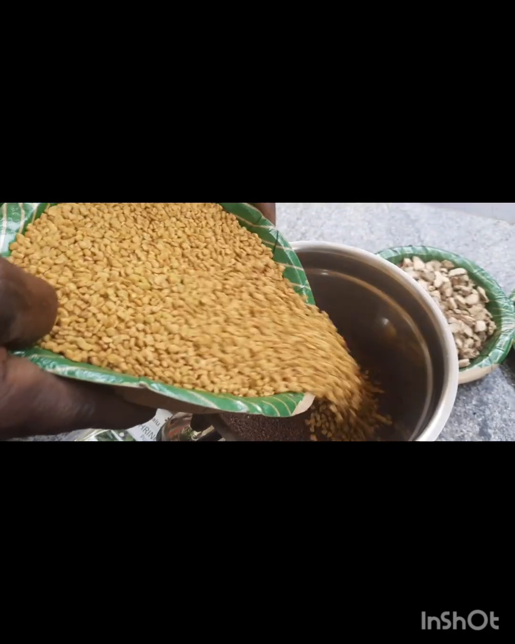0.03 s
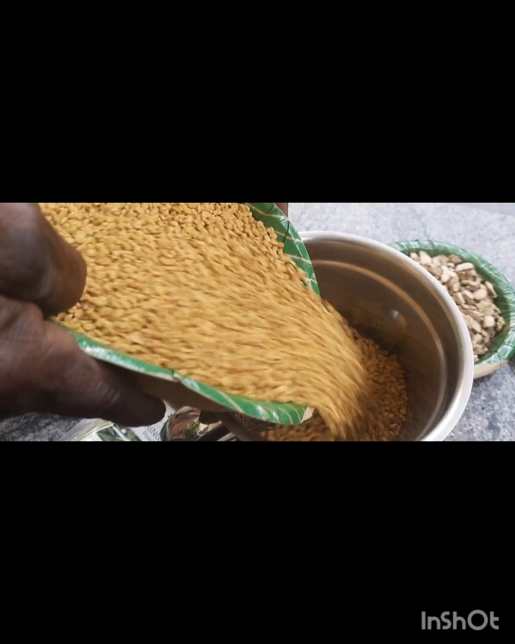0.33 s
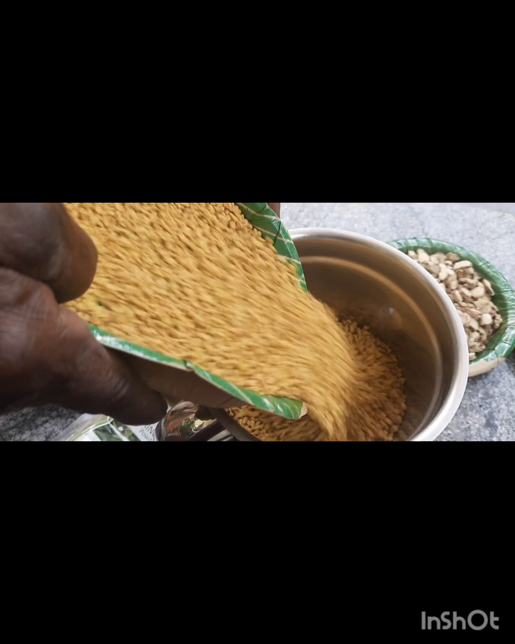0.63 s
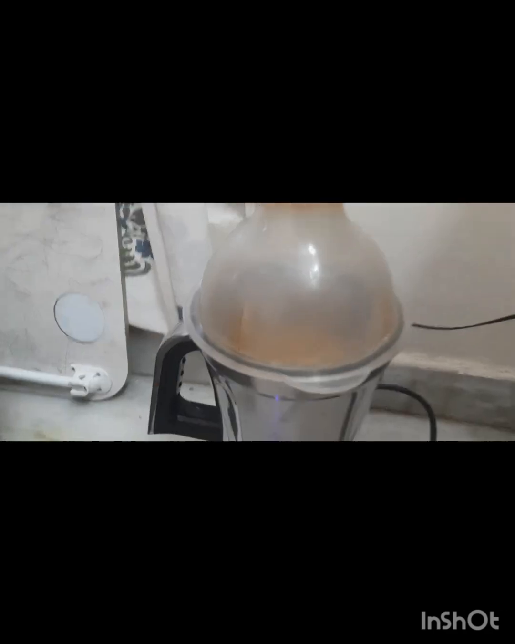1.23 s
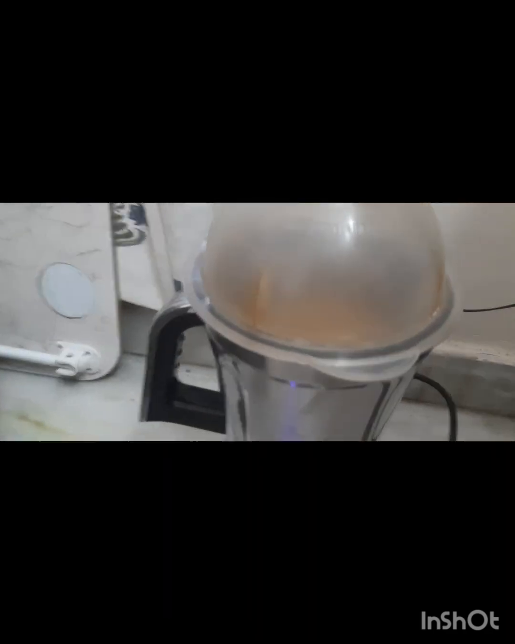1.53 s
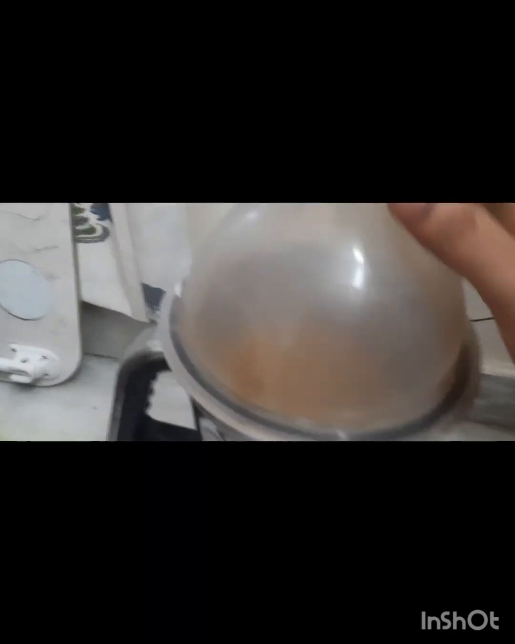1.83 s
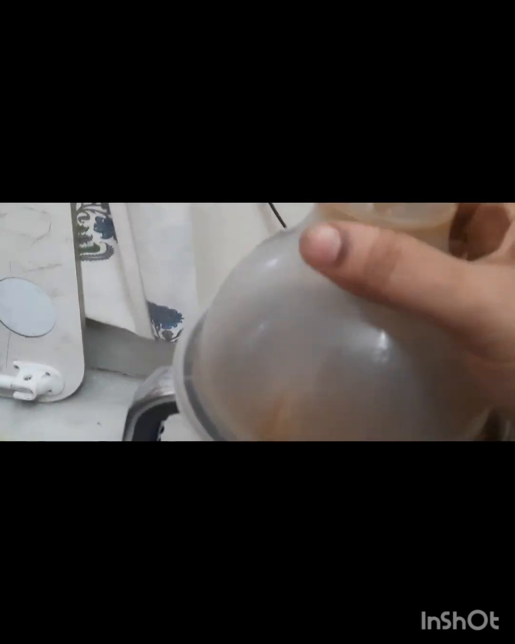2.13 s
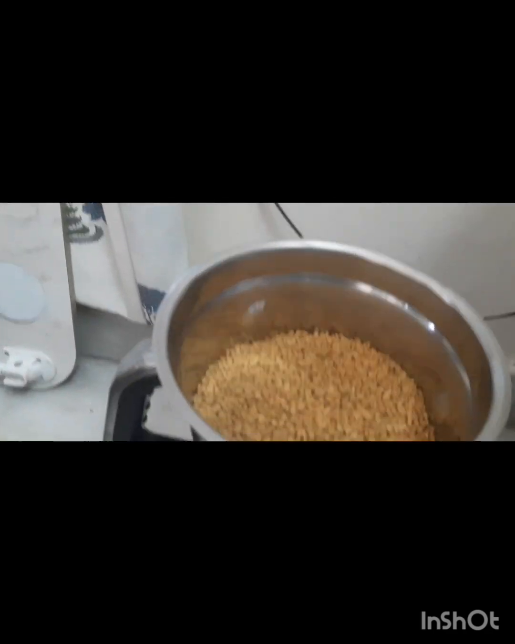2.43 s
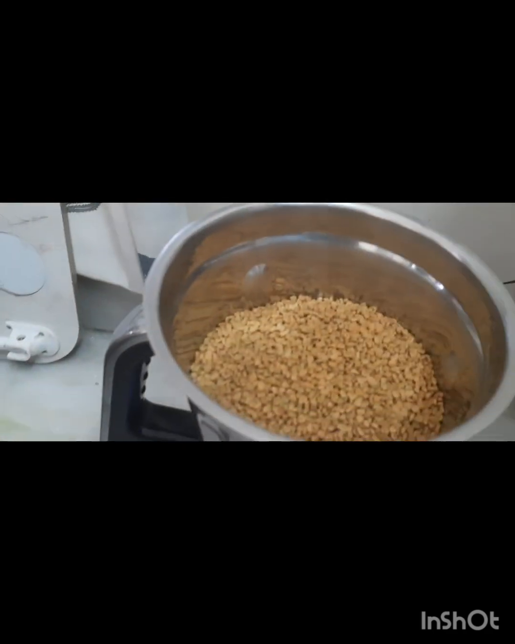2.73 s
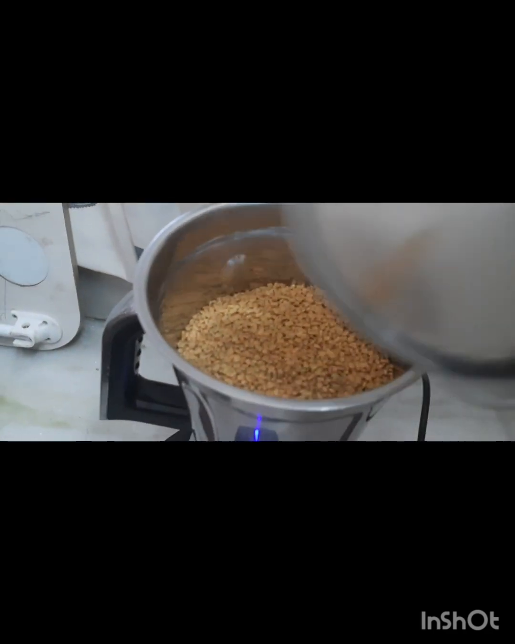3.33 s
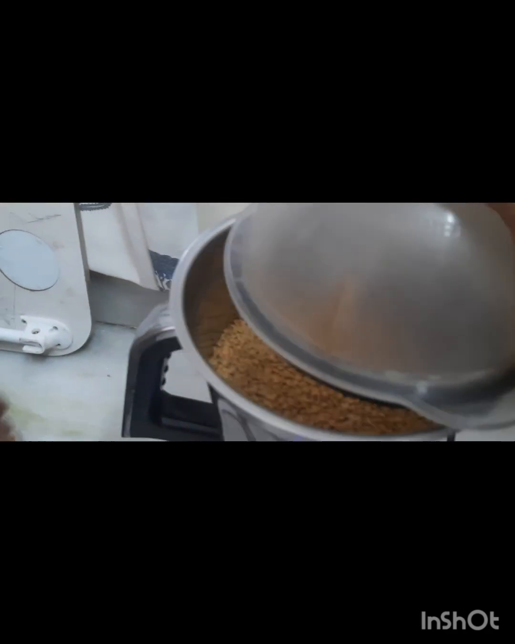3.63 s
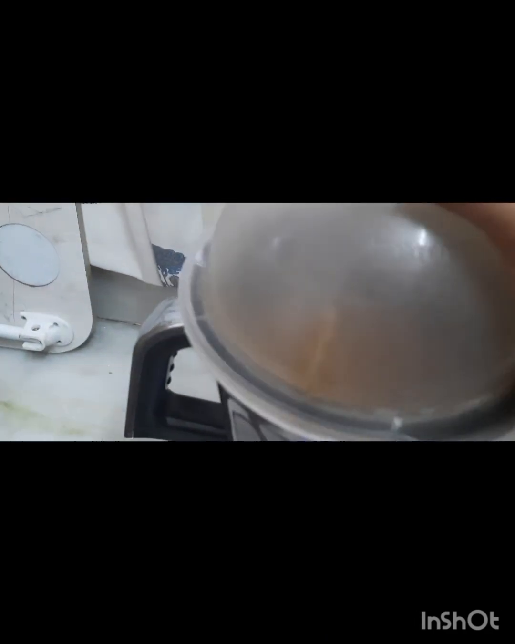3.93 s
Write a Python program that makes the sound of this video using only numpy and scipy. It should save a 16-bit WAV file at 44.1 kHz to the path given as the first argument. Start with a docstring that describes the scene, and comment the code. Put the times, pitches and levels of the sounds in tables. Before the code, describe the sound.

Dry seeds pour densely into a steel jar, close by, swelling and stopping dead at 1.3 seconds, followed by a microphone bump. From 1.8 to 2.2 seconds a plastic lid comes loose with soft hollow thuds and a snap. Thin bangles clink faintly. Around 3.4 seconds the lid lands with two sharper knocks, then thuds and scrapes on the ringing rim until 4 seconds, over a low kitchen hum.

```python
"""Dry seeds rush from a tray into a steel mixer jar, thousands of tiny impacts a second, then stop dead.
The hand-held phone close by is bumped. A domed plastic lid is worked loose, lifted off and knocked
back on with hollow thuds, its edge snapping and scraping on the ringing steel rim. Thin bangles
clink on the moving wrist, in a small kitchen with a low hum."""
import sys
import numpy as np
from scipy import signal
from scipy.fft import rfft, irfft
from scipy.io import wavfile
from scipy.ndimage import uniform_filter1d

SR = 44100
rng = np.random.default_rng(int(sys.argv[2]) if len(sys.argv) > 2 else 0)


def unload_audio(sound):
    """Save the sound as a 16-bit wav file, at the path given as the first command line argument."""
    columns = np.transpose(np.atleast_2d(sound))
    # keep every value between -1 and 1, then stretch to whole-number steps
    steps = np.round(np.clip(columns, -1, 1) * 32767)
    wavfile.write(sys.argv[1], SR, steps.astype(np.int16))


N = 176400

# swell of the pour: time_s, level_db
SEED_FLOW = [(0.1, -39), (0.2, -37), (0.45, -31.5), (0.6, -30.5), (1.0, -31.5), (1.33, -33.5)]
# EQ of seeds landing in the jar: freq_hz, gain_db
SEED_EQ = [(150, -35), (400, -16), (700, 1), (1000, -5), (1500, -1.5), (2200, -0.5), (3400, 0), (5100, 2.5),
           (7300, -2), (8500, -1.5), (10000, -7.5), (15500, -3)]
# lean to the left, applied in part to each side with opposite signs: freq_hz, lean_db
SEED_LEAN = [(380, -3), (700, -4.5), (1290, -0.5), (2380, 1.5), (4400, 6.5), (8120, 0.5), (15000, 9.5)]
# air resonances of the jar: pitch_hz, width_hz, level_db
JAR_AIR = [(1230, 126, -17), (1650, 220, -20)]
# EQ of the rumble under the pour: freq_hz, gain_db
RUMBLE_EQ = [(25, -44), (45, -14), (72, 5), (110, 0), (300, -19.5), (600, -60)]


def pour(start_s=0.077, stop_s=1.339, seed_db=1.92, echo_db=-8.5, rumble_db=-3.5):
    """A dense rush of seed impacts echoes in the jar, over a rumble that follows the flow."""
    t = np.arange(N) / SR
    flow = amp(np.interp(t, *np.array(SEED_FLOW).T))
    gate = np.clip((t - start_s) / 0.0088, 0, 1) * (t < stop_s)
    hits = stereo(grains(per_s=6000, spread_db=2, size=N))
    echoes = rng.standard_normal((2, SR // 16)) * fade(t60=0.035, size=SR // 16)
    inside = colour(signal.fftconvolve(hits, echoes, axes=1)[:, :N], [(2000, -5), (6000, -10.5)])
    seeds = unit(colour(hits + amp(echo_db) * unit(inside), SEED_EQ))
    for hz, width, db in JAR_AIR:
        seeds += amp(db) * unit(shape(hits, lambda f: 1 / (1 + 1j * (f - hz * hz / f) / width)))
    seeds = np.array([colour(seeds[0], SEED_LEAN, 0.49), colour(seeds[1], SEED_LEAN, -0.4)])
    rumble = unit(stereo_noise(RUMBLE_EQ, N)) * pan(-1.6)
    return flow * gate * (amp(seed_db) * seeds + amp(rumble_db) * rumble)


# hollow modes of the lid: pitch_hz, level_db, t60_s
LID_MODES = [(273, -3.5, 0.065), (336, -9.5, 0.032), (386, -7.5, 0.04), (504, -8.5, 0.031),
             (588, -1, 0.023), (678, 1.5, 0.015), (786, -12.5, 0.046)]
# slower ring of the jar under it: pitch_hz, level_db, t60_s
JAR_MODES = [(285, -8, 0.22), (385.4, 3.5, 0.19), (494.5, 0, 0.29), (548, -6, 0.27)]
# EQ of a knock's crack: freq_hz, gain_db
CRACK_EQ = [(150, -15), (400, 12.5), (700, 7), (1300, 1.5), (1800, -2), (3000, -0.5), (4500, -7),
            (6800, -15), (9000, -6), (16000, -17)]
# lid knocks (pressing stiffens the lid and shifts its pitch):
# start_s, body_db, cutoff_hz, crack_db, crack_t60_s, jar_db, pitch_ratio
LID_KNOCKS = [(1.8215, -10, 232, -30.5, 0.051, -72, 1.03), (1.984, -9, 234, -27.5, 0.067, -56, 1.05),
              (2.2075, -11.5, 200, -30.5, 0.065, -73, 1.04), (3.3761, -2, 1500, -17, 0.056, -31.5, 1.024),
              (3.4565, -2, 1190, -12, 0.033, -24.5, 1.04), (3.725, -25, 400, -38.5, 0.076, -37.5, 1.04),
              (3.7755, -4, 330, -16, 0.033, -36, 1.13), (3.861, -13, 200, -50, .03, -50, 1.11),
              (3.899, -8.5, 199, -53, .03, -60, 0.99)]


def lid_knocks(low_cut_hz=220, graze_s=0.017, graze_db=-12.5):
    """Each knock cracks and rings lid and jar; a softer contact leaves only the lid's low modes."""
    out, size = np.zeros((2, N)), SR // 2
    for s, db, cutoff_hz, crack_db, crack_t60, jar_db, ratio in LID_KNOCKS:
        modes = [(hz * ratio, g - 10 * np.log10(1 + (hz / cutoff_hz) ** 4), t60)
                 for hz, g, t60 in LID_MODES]
        body = amp(db) * ring(modes, size, rise_cycles=0.57)  # the lows bloom late
        jar = amp(jar_db) * ring(JAR_MODES, size)
        hollow = low_cut(body + jar, low_cut_hz)  # small objects radiate little bass
        crack = unit(low_cut(stereo_noise(CRACK_EQ, size), low_cut_hz))
        add(out, s, hollow * pan(-3.5) + amp(crack_db) * crack * fade(crack_t60, size) * pan(1.4))
        if cutoff_hz < 600:  # on soft knocks the edge grazes just before it lands
            lead = int(graze_s * SR)
            add(out, s - graze_s, amp(crack_db + graze_db) * crack[:, -lead:] * np.linspace(0, 1, lead))
    return out


# EQ of a snap: freq_hz, gain_db
SNAP_EQ = [(200, -25), (800, -7.5), (2300, -13), (3300, -2.5), (4100, 1.5), (5800, -3), (7000, -20),
           (8500, -1), (11000, -5.5), (16000, -9)]
# snaps of the lid's edge: start_s, level_db, tilt_db_per_octave
LID_SNAPS = [(1.9223, -12.5, 0), (1.9664, -24.5, -7)]


def lid_snaps(t60_s=0.025):
    """The plastic edge slips over the rim with a short, dry snap."""
    out, size = np.zeros((2, N)), SR // 8
    for s, db, tilt_db in LID_SNAPS:
        noise = unit(tilt(colour(rng.standard_normal((2, size)), SNAP_EQ), tilt_db))
        add(out, s, amp(db) * noise * fade(t60_s, size) * pan(5))
    return out


# modes of the steel rim before the hand damps them: pitch_hz, level_db, t60_s
RIM_MODES = [(5060, -8, .12), (5450, -4, .16), (8540, -14, .14), (9740, -4, .12), (10480, -3, .12),
             (10560, -5, .1), (11190, -9, .07), (12600, -4, .14), (13860, -10, .08), (15680, 1, .14)]
# scrapes along the rim: start_s, level_db, scrape_t60_s, focus_hz, pan_db
RIM_SCRAPES = [(3.637, -37, 0.022, 14000, 6.5), (3.672, -37, 0.22, 12800, 7),
               (3.792, -34.5, 0.033, 11330, 8), (3.824, -29, 0.035, 11300, 5),
               (3.898, -22, 0.015, 11600, 11), (3.909, -29.5, 0.13, 12400, 3),
               (3.958, -34, 0.052, 11100, 6)]


def rim_scrapes():
    """The lid's edge drags along the steel rim and makes it sing."""
    return metal(RIM_SCRAPES, RIM_MODES, spread_hz=3500, grit_db=-2)


# modes of thin bangles before the hand damps them: pitch_hz, level_db, t60_s
BANGLE_MODES = [(5900, -11, .15), (7470, -9, .12), (9020, -5, .12), (10400, -3, .12), (10860, -7, .15),
                (11950, -9, .12), (13700, -4, .12), (14460, -2, .08), (15400, -8, .12)]
# clinks at the wrist: start_s, level_db, rattle_t60_s, focus_hz, pan_db
BANGLE_CLINKS = [(1.746, -33.5, 0.014, 14500, 3), (1.778, -45, .04, 7700, -3),
                 (1.907, -45, 0.013, 14000, 5), (2.078, -39.5, .02, 10000, 2), (2.13, -47, 0.03, 11500, 2),
                 (2.414, -32, 0.014, 12500, -3), (2.433, -32, 0.064, 13000, -1.5),
                 (2.74, -44.5, 0.11, 12500, 8), (2.925, -47, 0.13, 11200, 5), (3.226, -40, 0.015, 10900, 1),
                 (3.277, -46.5, 0.018, 8100, -1), (3.32, -45, 0.15, 12000, -1)]


def bangle_clinks():
    """Bangles rattle together with a bright shimmer as the hand moves."""
    return metal(BANGLE_CLINKS, BANGLE_MODES, spread_hz=4900, grit_db=-3)


# EQ of the sliding: freq_hz, gain_db
RUB_EQ = [(300, 4), (1200, -5), (2400, -3), (3700, 0.5), (7000, -2.5), (12000, 1.5), (16000, -5)]
# slides of the lid: start_s, length_s, level_db, tilt_db_per_octave
LID_RUBS = [(1.449, 0.16, -44.5, 3.5), (1.78, 0.18, -45.5, -1), (1.922, 0.069, -45, -1),
            (2.015, 0.16, -43.5, -0.5), (2.164, 0.078, -40.5, -1.5), (3.128, 0.091, -44.5, -7),
            (3.372, 0.083, -44, -8), (3.477, 0.16, -43, -4.5), (3.545, 0.036, -39, -1),
            (3.745, 0.24, -38.5, -0.5)]


def lid_rubs(rise_share=0.13):
    """Plastic slides over steel and seeds shift: grit that swells quickly and dies away."""
    out, size = np.zeros((2, N)), SR // 2
    t = np.arange(size) / SR
    for s, length, db, tilt_db in LID_RUBS:
        slips = stereo(grains(per_s=1800, spread_db=4.4, size=size))
        grit = unit(tilt(colour(slips, RUB_EQ), tilt_db))
        swell = np.sqrt(np.interp(t / length, [0, rise_share, 1], [0, 1, 0]))
        add(out, s, amp(db) * grit * swell * pan(2.9))
    return out


# bumps on phone and tray, and the low thud of the lid's last soft knock:
# start_s, level_db, pitch_hz, t60_s, pan_db
BUMPS = [(0.0575, -8, 880, 0.0068, 0), (0.0615, -9, 1040, 0.0073, -17), (0.0634, -20.5, 416, 0.016, -3),
         (0.0748, -22, 750, 0.012, -4), (1.3888, 2.5, 340, 0.007, -34), (1.3886, -14, 1360, 0.0035, -32),
         (1.4105, -15, 1110, 0.0047, -28), (3.895, -29.5, 86, .09, -4)]


def bumps(grit_db=-13):
    """Dull thumps: one heavily damped mode each, with a trace of grit."""
    out, size = np.zeros((2, N)), SR // 8
    for s, db, hz, t60, pan_db in BUMPS:
        grit = unit(colour(rng.standard_normal(size), [(1500, 8), (3500, -49), (16000, -16)]))
        thump = ring([(hz, 0, t60)], size) + amp(grit_db) * grit * fade(t60, size)
        add(out, s, amp(db) * low_cut(thump, hz=70) * pan(pan_db))
    return out


# EQ of the finger's brush: freq_hz, gain_db
BRUSH_EQ = [(30, -12), (90, -2), (250, -4), (1000, -18.5), (4000, -29), (16000, -43)]


def finger_brush(peak_s=1.392, width_s=0.024, level_db=-21.5):
    """A finger brushes the right microphone around the big bump."""
    swell = np.exp(-abs(np.arange(N) / SR - peak_s) / width_s)
    right = amp(level_db) * swell * unit(colour(rng.standard_normal(N), BRUSH_EQ))
    return np.array([np.zeros(N), right])


# EQ of the tray's clatter: freq_hz, gain_db
CLATTER_EQ = [(100, -5), (350, -1), (1500, -1), (3000, -25), (16000, -25)]


def tray_clatter(start_s=0.06, level_db=-22, t60_s=0.064):
    """The tipping tray meets the jar with a short, dull rattle."""
    out, size = np.zeros((2, N)), SR // 8
    add(out, start_s, amp(level_db) * unit(stereo_noise(CLATTER_EQ, size)) * fade(t60_s, size))
    return out


# EQ of the room's tail: freq_hz, gain_db
ROOM_EQ = [(100, 2), (280, 4.5), (500, 6.5), (900, 2), (16000, 1)]


def kitchen_reverb(x, t60_s=0.48, send_db=-15.5):
    """Hard walls return a short, warm tail."""
    size = SR // 2
    onset = np.clip(np.arange(size) / SR / 0.0032 - .5, 0, 1)
    tail = stereo(rng.standard_normal((2, size))) * fade(t60_s, size) * onset
    tail = colour(tail / np.sqrt(np.sum(tail ** 2) / 2), ROOM_EQ)[:, :size - size // 8]
    return amp(send_db) * signal.fftconvolve(x, tail, axes=1)[:, :N]


# EQ of the room tone: freq_hz, gain_db
ROOM_TONE_EQ = [(25, -30), (42, -6), (64, 10.5), (95, 4), (200, -5), (350, 3), (560, -6.5), (860, -7.5),
                (1500, -15.5), (4000, -22.5), (16000, -25)]


def room_tone(level_db=-46):
    """The kitchen's steady bed of low hum and hiss."""
    return amp(level_db) * unit(stereo_noise(ROOM_TONE_EQ, N)) * pan(-1.7)


def metal(touches, modes, spread_hz, grit_db, hand_damping=1.2, scatter_db=7, detune=0.06, partner_db=-6):
    """Runs of tiny contacts ring metal; each touch wakes a new mix of modes, favouring its focus pitch."""
    out, size = np.zeros((2, N)), SR // 3
    t = np.arange(size) / SR
    for s, db, run_t60, focus_hz, pan_db in touches:
        attack = 1 - np.exp(-t / (0.075 * run_t60))
        slips = grains(per_s=4500, spread_db=2.1, size=size) * fade(run_t60, size) * attack
        reach = lambda f: 1 / (1 + ((f - focus_hz) / spread_hz) ** 2)
        partners = [(f * (1 + detune * rng.standard_normal()), g + partner_db, t60)
                    for f, g, t60 in list(modes) * 2]
        struck = [(f, g + scatter_db * rng.standard_normal() + 20 * np.log10(reach(f)), t60 / hand_damping)
                  for f, g, t60 in list(modes) + partners]
        tone = signal.fftconvolve(slips, ring(struck, SR // 6)[None], axes=1)[:, :size]
        grit = low_cut(shape(slips, reach), hz=4600)
        sound = unit(tone) + amp(grit_db) * unit(grit)
        loudest = np.sqrt(uniform_filter1d(sound ** 2, size=441).max(axis=1, keepdims=True))
        add(out, s, amp(db) * sound / loudest * pan(pan_db))
    return out


def ring(modes, size, rise_cycles=0):
    """Decaying modes (pitch_hz, level_db, t60_s), each building up over rise_cycles."""
    t = np.arange(size) / SR
    return sum(amp(db) * np.sin(2 * np.pi * hz * t) * fade(t60, size)
               * (1 - np.exp(-hz * t / max(rise_cycles, 1e-6))) for hz, db, t60 in modes)


def grains(per_s, spread_db, size):
    """Tiny impacts of random timing and strength, on two channels."""
    hit = rng.random((2, size)) < per_s / SR
    polarity = rng.choice([-1, 1], (2, size))
    strength = amp(spread_db * np.minimum(rng.standard_normal((2, size)), 2))
    return unit(hit * polarity * strength)


def stereo(x, alike_hz=770):
    """Two unrelated noises as left and right: alike in the bass, wide in the treble."""
    width = lambda f: np.minimum(np.hypot(.2, f / alike_hz / 2), 1)
    side = shape(x[1], width)
    mid = shape(x[0], lambda f: np.sqrt(2 - width(f) ** 2))
    return np.array([mid + side, mid - side]) / np.sqrt(2)


def stereo_noise(eq, size):
    return colour(stereo(rng.standard_normal((2, size))), eq)


def shape(x, gain):
    """Filter by a gain given as a function of frequency."""
    freqs = np.fft.rfftfreq(x.shape[-1], 1 / SR) + 1e-3
    return irfft(rfft(x) * gain(freqs), x.shape[-1])


def colour(x, eq, share=1):
    """Apply a share of an EQ curve (freq_hz, gain_db)."""
    hz, db = np.array(sorted(eq)).T
    return shape(x, lambda f: amp(share * np.interp(np.log(f), np.log(hz), db)))


def tilt(x, db):
    """Tilt the treble by db per octave."""
    return shape(x, lambda f: amp(db * np.log2(np.maximum(f, 1500) / 1500)))


def low_cut(x, hz):
    return signal.sosfilt(signal.butter(2, hz, "highpass", fs=SR, output="sos"), x)


def amp(db):
    return 10 ** (np.asarray(db) / 20)


def unit(x):
    """Scale to rms 1."""
    return x / np.sqrt(np.mean(x ** 2) + 1e-18)


def pan(db):
    """Constant-power gains; positive is left."""
    return unit(amp(np.array([[db], [-db]]) / 2))


def fade(t60, size):
    """Fall by 60 dB every t60 seconds."""
    return np.exp(-np.log(1000) * np.arange(size) / SR / max(t60, 1e-3))


def add(out, s, sound):
    """Mix a sound in at s seconds."""
    i = max(int(s * SR), 0)
    out[:, i:i + sound.shape[-1]] += sound[..., :max(N - i, 0)]


def scene():
    """Pour, clatter, bumps and brush stay dry; the rest of the lid work feeds the reverb."""
    lid_work = rim_scrapes() + bangle_clinks() + lid_knocks() + lid_snaps() + lid_rubs()
    close = pour() + tray_clatter() + bumps() + finger_brush()
    return close + lid_work + kitchen_reverb(lid_work) + room_tone()


def record(dry):
    """The phone clips at full scale and cuts the top above 16 kHz."""
    top_cut = signal.ellip(10, .2, 80, 16000, fs=SR, output="sos")
    return signal.sosfilt(top_cut, np.clip(dry, -1, 1))


dry = scene()
out = record(dry)
unload_audio(out)
```